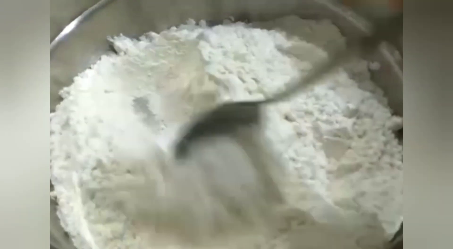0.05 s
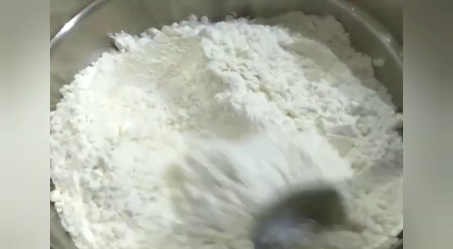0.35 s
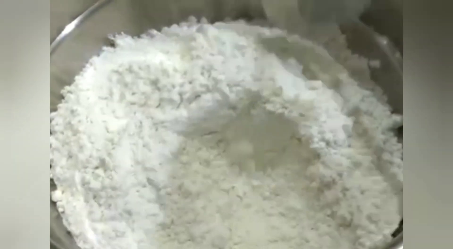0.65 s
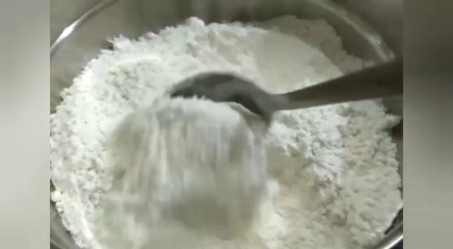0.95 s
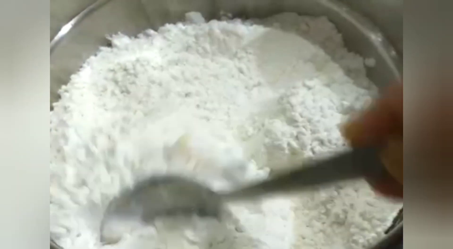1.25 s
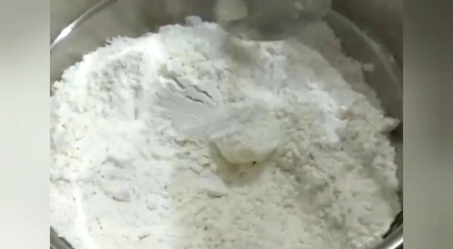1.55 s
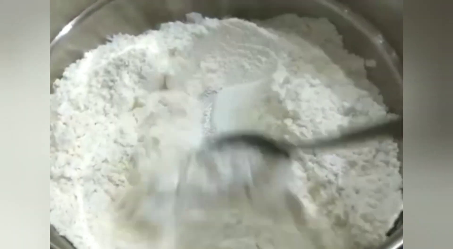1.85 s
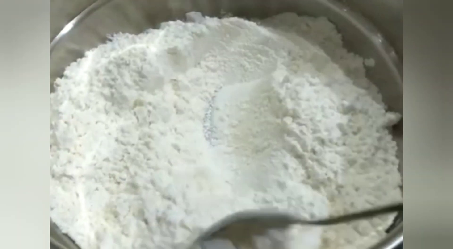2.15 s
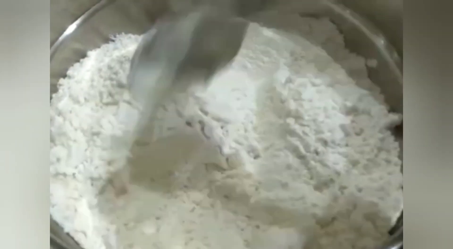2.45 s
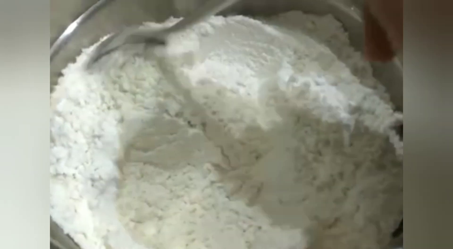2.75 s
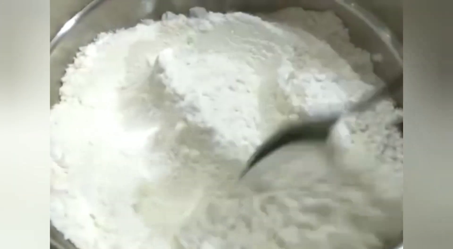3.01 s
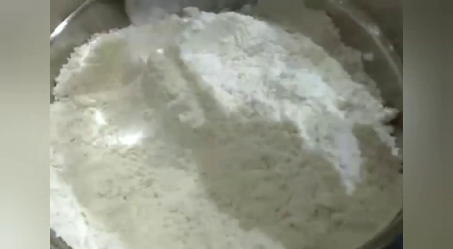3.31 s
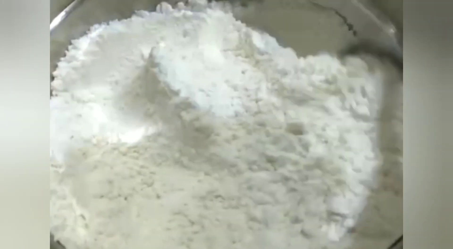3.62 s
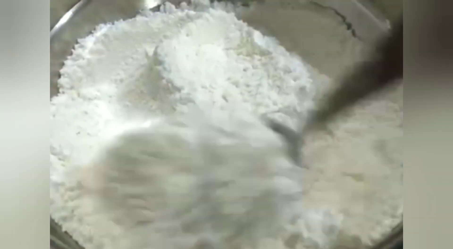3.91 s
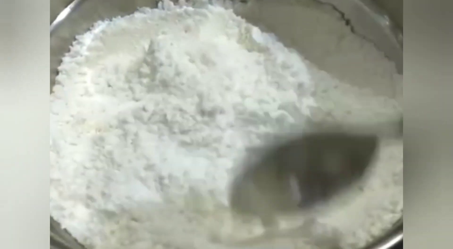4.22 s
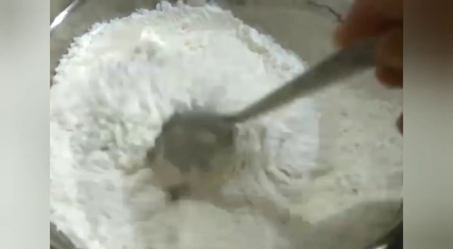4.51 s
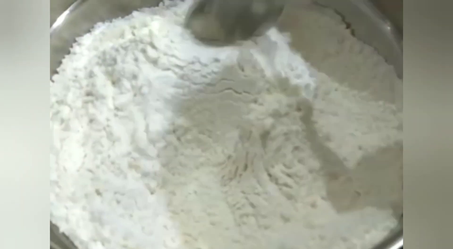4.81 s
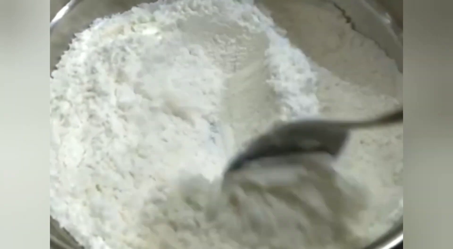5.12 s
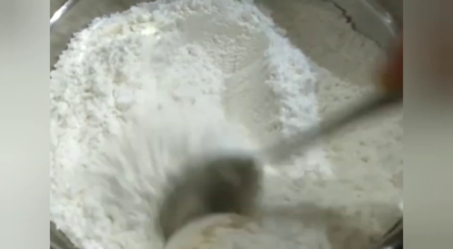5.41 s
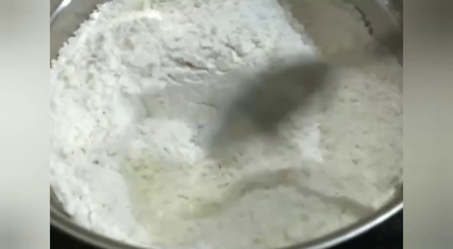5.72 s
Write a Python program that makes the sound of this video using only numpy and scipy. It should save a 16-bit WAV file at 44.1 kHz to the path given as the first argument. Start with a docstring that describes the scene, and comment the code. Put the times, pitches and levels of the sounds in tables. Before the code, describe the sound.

A metal spoon stirs flour in a steel bowl, with muffled knocks and dry scrapes over a low fan hum.

```python
"""Muffled knocks and dry scrapes: a steel spoon stirs flour in a stainless bowl, close by in a kitchen.
Each dig ends in a flour-cushioned knock: the bowl thuds and booms, then the spoon slides on.
Trapped powder sticks and slips in a rasp, bare steel squeaks, loose flour rushes aside.
A fan hums in the small room; two microphone ports are cross-subtracted to widen the stereo image."""
import sys
import numpy as np
from scipy import signal
from scipy.fft import rfft, irfft, next_fast_len
from scipy.io import wavfile
from scipy.ndimage import uniform_filter1d

SR = 44100
rng = np.random.default_rng(int(sys.argv[2]) if len(sys.argv) > 2 else 0)


def generate_wav(signal):
    """Clip the signal to [-1, 1] and save it as 16-bit WAV at the path in sys.argv[1]."""
    frames = np.transpose(np.atleast_2d(signal))
    scaled = np.clip(frames, -1, 1) * 32767
    pcm = np.round(scaled).astype(np.int16)
    wavfile.write(sys.argv[1], SR, pcm)


N = 262836
PORT_DELAY_S = 0.000427

# Spoon lands on the bottom and drags on: t/s, thud/dB, thud/Hz, thud crest/cycles, wall ring/dB,
# boom/dB, rattle/dB, clank/dB, clank/Hz, tick/dB, tick brightness/dB, steel ring/dB, drag/dB
KNOCKS = [(-0.010, -14, 305, 1.07, -15, -23.5, -23, -38, 990, -14, -24, -56, -63),
          (0.3533, -20, 414, 0.87, -23, -39.5, -32, -30, 1280, -39.5, 3, -50, -51),
          (0.8629, -14.5, 311, 0.88, -17, -26, -26, -12.5, 733, -40, 6, -63, -72),
          (1.2304, -10, 477, 0.99, -11, -31, -27, -21, 1290, -34, -3, -38.5, -56.5),
          (1.752, -17.5, 364, 0.87, -20, -28.5, -19, -32, 1396, -32, -27, -67, -52),
          (2.2292, -16.5, 432, 1.49, -19, -37, -28, -17.5, 1343, -32.5, 8.5, -48, -69),
          (2.81, -24, 340, 1.7, -18, -29.5, -26.5, -33, 1390, -26.5, -8.5, -47, -52.5),
          (3.2637, -30.5, 390, 0.74, -27, -41.5, -24.5, -32, 1860, -39.5, -12, -68, -71),
          (3.4374, -19.5, 365, 0.83, -18.5, -31.5, -26.5, -38, 1310, -30, -8, -69, -76),
          (4.935, -15.5, 357, 0.83, -18, -26.5, -20, -21, 1205, -32, -11, -52.5, -57),
          (5.473, -5, 487, 0.99, -14.5, -28.5, -23.5, -18.5, 1435, -25, -8.5, -62, -66),
          (5.884, -12, 511, 0.76, -15.5, -43, -22, -44, 770, -36.5, -7, -49, -68)]
# High modes of spoon and rim: f/Hz, level/dB, t60/s
STEEL_MODES = [(3365, -9.5, 0.1), (3550, -8, 0.023), (3726, 2, 0.035), (4090, -9, 0.04), (5080, 3, 0.033),
               (5490, -0.5, 0.064), (6400, -11, 0.16), (6620, -2, 0.091), (7490, -1.5, 0.086),
               (7560, -18, 0.073), (8470, -13.5, 0.11), (10700, -20, 0.058), (12540, -26, 0.1)]


def thuds(overtone_ratio=1.74, overtone_db=-12, wall_rise_s=0.0065, load_detune=0.0085):
    """A cushioned blow pushes the bowl for a few cycles; the wall rings on, retuned by shifting flour."""
    # Flour-damped bowl: f/Hz, level/dB, t60/s
    bowl_modes = [(224.8, -26, 0.35), (281, -19, 0.099), (325, -24.5, 0.4), (351, -11.5, 0.18),
                  (467.8, -23.5, 0.33), (556, -30.5, 0.39), (636, -29, 0.47), (674.6, -16.5, 0.12),
                  (796.4, -14, 0.076), (831, -27, 0.14), (953, -29, 0.12), (1260, -33, 0.08),
                  (1362, -20, 0.043)]
    out, t = np.zeros((2, N)), np.arange(SR // 2) / SR
    for s, db, hz, crest_cycles, wall_db, *_ in KNOCKS:
        age, phase = hz * t / crest_cycles, 2 * np.pi * hz * t
        envelope = (age * np.exp(1 - age)) ** 4
        push = envelope * (np.sin(phase) + amp(overtone_db) * np.sin(overtone_ratio * phase))
        loaded = [(mode_hz * (1 + load_detune * rng.standard_normal()), mode_db, t60_s)
                  for mode_hz, mode_db, t60_s in bowl_modes]
        wall = np.array([ring(loaded, t) for port in range(2)]) * (1 - np.exp(-t / wall_rise_s))
        add(out, s, amp(db) * push * amp([[2.4], [-2.4]]) + amp(wall_db) * wall)
    return band(out, 106, 8400, order=3)  # a small bowl radiates no deep bass


def booms(hz=154.2, rise_s=0.0071, t60_s=0.46):
    """After each knock the bowl's base rings on one hollow note."""
    out, t = np.zeros((2, N)), np.arange(SR // 2) / SR
    envelope = (1 - np.exp(-t / rise_s)) * amp(-60 * t / t60_s)
    note = envelope * np.sin(2 * np.pi * hz * t)
    for s, _, _, _, _, boom_db, *_ in KNOCKS:
        add(out, s, amp(boom_db) * note * amp([[.7], [-.7]]))
    return out


def contacts(knock_tick_hz=4010, tap_tick_hz=3100, clank_re_rattle_db=1.5, ring_re_tick_db=-28):
    """Metal hits: t/s, rattle/dB, clank/dB, clank/Hz, tick/dB, tick/Hz, brightness/dB, ring/dB."""
    # Spoon edge touches the wall: t/s, rattle/dB, clank/Hz, tick/dB, tick brightness/dB
    edge_taps = [(0.1297, -27.5, 2130, -38, -25), (0.543, -52, 1800, -39, -13),
                 (0.863, -33.5, 1530, -48, -10), (2.827, -38, 1490, -43, -13), (2.8836, -47, 1600, -32, -8),
                 (3.0795, -34.5, 920, -59, -18), (3.211, -37, 2130, -42.5, -13),
                 (3.452, -34, 1440, -52, -12), (4.8325, -37.5, 1090, -65, -13),
                 (5.44, -24.5, 2080, -37.5, 1), (5.4523, -40, 1900, -30.5, -20),
                 (5.4957, -40, 1290, -36, -15)]
    knocks = [(s, rattle_db, clank_db, clank_hz, tick_db, knock_tick_hz, bright_db, ring_db)
              for s, *_, rattle_db, clank_db, clank_hz, tick_db, bright_db, ring_db, _ in KNOCKS]
    taps = [(s, rattle_db, rattle_db + clank_re_rattle_db, clank_hz,
             tick_db, tap_tick_hz, bright_db, tick_db + ring_re_tick_db)
            for s, rattle_db, clank_hz, tick_db, bright_db in edge_taps]
    return knocks + taps


def clinks(wall_t60_s=0.015, tick_t60_s=0.026, wall_rise_s=0.0017, tick_rise_s=0.0012):
    """Metal bites through the powder: wall clank and rattle, a bright tick, a faint ring."""
    out, t = np.zeros((2, N)), np.arange(SR // 6) / SR
    onset = lambda rise_s: 1 - np.exp(-(t / rise_s) ** 2)
    for s, rattle_db, clank_db, clank_hz, tick_db, tick_hz, bright_db, ring_db in contacts():
        noise = rng.standard_normal((2, len(t)))
        rattle = amp(rattle_db) * unit(band(noise, clank_hz / 2.5, clank_hz * 1.36))
        clank = amp(clank_db) * np.sin(2 * np.pi * clank_hz * t)
        wall = onset(wall_rise_s) * amp(-60 * t / wall_t60_s) * (clank + rattle)
        tick = amp(tick_db - 60 * t / tick_t60_s) * grit(len(t), tick_hz, bright_db, spiky_db=3)
        bite = onset(tick_rise_s) * (tick + amp(ring_db) * ring(STEEL_MODES, t))
        add(out, s, wall * amp([[-2.5], [1.8]]) + bite * amp([[1.5], [-3]]))
    return out


def strokes(drag_s=0.0635, drag_hz=4160, sweep_hz=4650, sweep_bright_db=7, swell_db=5):
    """Sliding contacts: a course of (t/s, pressure/dB, brightness/dB) rows and a rasp/Hz for each."""
    # Spoon presses through to the steel: start/s, length/s, level/dB, rasp/Hz
    presses = [(0.000, 0.038, -45, 3100), (0.042, 0.1, -58.5, 3750), (0.409, 0.019, -40, 4330),
               (0.865, 0.015, -40, 8000), (0.883, 0.025, -38, 8000), (2.253, 0.086, -45, 3900),
               (2.885, 0.02, -42.5, 3540), (3.272, 0.029, -46.5, 3500), (3.558, 0.0046, -32.5, 8500),
               (3.57, 0.01, -38, 8500), (3.581, 0.0058, -35, 8500), (4.315, 0.06, -58, 5100),
               (4.543, 0.021, -52.5, 5500), (5.537, 0.02, -51.5, 6000), (5.907, 0.045, -47, 4650)]
    # One long sweep round the wall: t/s, pressure/dB, brightness/dB re sweep_bright_db
    sweep_course = [(3.461, -55, -5), (3.528, -39.5, -2.5), (3.586, -44.5, 4), (3.594, -44, -5.5),
                    (3.698, -47, -1), (3.765, -43, -30), (3.811, -66, -7)]

    def swell(s, length_s, db, bright_db):
        return [(s, db - swell_db / 2, bright_db), (s + length_s, db + swell_db / 2, bright_db)]
    drags = [(swell(s, drag_s, db, bright_db=5.5), drag_hz) for s, *_, db in KNOCKS]
    rasps = [(swell(s, length_s, db, bright_db=-1.5), hz) for s, length_s, db, hz in presses]
    sweep = [(s, db, bright_db + sweep_bright_db) for s, db, bright_db in sweep_course]
    return drags + rasps + [(sweep, sweep_hz)]


def scrapes(edge_s=0.0009, crunch_db=-5, wall_ref_db=-14, wall_ref_hz=4650, wall_db_per_octave=-12):
    """Trapped powder sticks and slips: hiss through the steel, a low rasp from the wall."""
    treble, wall = np.zeros((2, N)), np.zeros((2, N))
    for course, rasp_hz in strokes():
        s, db, bright_db = np.transpose(course)
        start, end = s[0], s[-1]
        t = start + np.arange(round((end - start) * SR) + SR // 20) / SR
        contact = np.tanh((t - start) / edge_s) * (1 - np.tanh((t - end) / edge_s)) / 2
        pressure = contact * amp(np.interp(t, s, db))
        rasp = grit(len(t), rasp_hz, np.interp(t, s, bright_db), spiky_db=2.5)
        add(treble, start, pressure * (rasp + amp(crunch_db) * crunch(len(t))))
        wall_db = wall_ref_db + wall_db_per_octave * np.log2(rasp_hz / wall_ref_hz)
        add(wall, start, amp(wall_db) * pressure * unit(band(diffuse(len(t)), 400, 1180)))
    return wall + steel_ring(patchy(treble)) * amp([[-5.3], [-9.3]])


def grit(n, rasp_hz, bright_db, spiky_db, clump_db=1.5):
    """Clumped micro-slips: a rasp pitched by the contact point, plus hiss at bright_db re the rasp."""
    lumps = lambda size: unit(uniform_filter1d(rng.standard_normal(n), size))
    strength = amp(spiky_db * lumps(size=24) + clump_db * lumps(size=220))
    coarse, fine = rng.standard_normal((2, 2, n)) * strength
    rasp = unit(band(coarse, rasp_hz / 1.49, rasp_hz * 1.41))
    fizz = band(fine, 5200, 19500)
    hiss = unit(band(fizz, 1300, 5600, order=1))
    return rasp + amp(bright_db) * hiss


def crunch(n, crumbs_per_s=280, spread_db=0.5, decay_s=0.0005):
    """Flour lumps burst under the spoon, one crackle each."""
    bursts = rng.random(n) < crumbs_per_s / SR
    sizes = amp(spread_db * np.clip(rng.standard_normal(n), -2, 2))
    envelope = signal.lfilter([1], [1, -np.exp(-1 / (decay_s * SR))], bursts * sizes)
    return unit(band(envelope * rng.standard_normal((2, n)), 900, 11000, order=1))


def patchy(x, patchy_db=4.0):
    """Random gain over time and frequency gives the scrape an uneven, shifting colour."""
    spectrum = signal.stft(x, nperseg=512)[2]
    patches = uniform_filter1d(rng.standard_normal(spectrum.shape[1:]), size=4, axis=0)
    patches = uniform_filter1d(patches, size=4, axis=1)
    gain = unit(amp(patchy_db * unit(patches)))
    return signal.istft(spectrum * gain, nperseg=512)[1][:, :N]


def steel_ring(x, ring_db=-44.5):
    """Excitation heard directly and through the steel's modes, weighted anew at each port."""
    t = np.arange(SR // 4) / SR
    response = np.array([ring(STEEL_MODES, t) for port in range(2)])
    return x + amp(ring_db) * signal.fftconvolve(x, response, axes=1)[:, :N]


def squeaks(relative_width=0.023):
    """Uneven stick-slip feeds one narrow resonance, which glides as the contact moves."""
    # Bare steel catches on steel: start/s, length/s, level/dB, f/Hz, glide/Hz
    catches = [(0.004, 0.035, -59, 3226, 200), (0.412, 0.02, -59, 3280, 0), (0.414, 0.018, -60, 5780, 0),
               (0.864, 0.018, -48.5, 1776, 224), (0.867, 0.0066, -51.5, 3150, -2),
               (0.871, 0.01, -46.5, 7960, 0), (0.877, 0.032, -50, 1208, 345), (0.888, 0.028, -52, 990, 150),
               (0.965, 0.053, -60, 1040, 405), (2.284, 0.029, -56, 3310, 400),
               (2.314, 0.024, -58.5, 3740, 250), (2.824, 0.008, -44, 2947, 0),
               (2.882, 0.021, -48.5, 3570, -5), (2.884, 0.028, -60, 8000, 0),
               (3.495, 0.042, -52, 1295, 138), (3.505, 0.033, -54, 3180, 3), (3.515, 0.11, -60, 4210, -800),
               (3.558, 0.023, -47, 6380, 0), (3.56, 0.032, -48, 8260, 0), (3.56, 0.022, -47.5, 10800, 0),
               (3.658, 0.044, -54, 6250, 0), (3.715, 0.06, -64, 3300, 500), (4.945, 0.048, -59.5, 905, 480),
               (5.915, 0.069, -57.5, 3810, 0)]
    out = np.zeros((2, N))
    for s, length_s, db, hz, glide_hz in catches:
        n = round(length_s * SR)
        t = np.arange(n) / SR
        noise = rng.standard_normal(n + SR // 10)
        resonance = band(noise, hz * (1 - relative_width / 2), hz * (1 + relative_width / 2))
        glide = np.exp(1j * np.pi * glide_hz * t ** 2 / length_s)
        tone = unit(np.real(signal.hilbert(resonance)[-n:] * glide))
        add(out, s, amp(db) * tone * signal.windows.tukey(n, .5) * amp([[1.5], [-2.5]]))
    return out


def slumps():
    """Loose flour is ploughed aside or trickles off the spoon with a soft rush."""
    # Flour slides: peak/s, half length/s, level/dB, centre/Hz
    slides = [(0.18, 0.14, -61, 4500), (2.348, 0.086, -51, 520), (3.098, 0.28, -66, 7550),
              (3.53, 0.044, -42, 730), (3.685, 0.16, -47, 417), (4.34, 0.035, -44.5, 244),
              (5.248, 0.26, -66.5, 6500)]
    out, t = np.zeros((2, N)), np.arange(-SR // 2, SR // 2) / SR
    for s, half_s, db, hz in slides:
        rush = unit(band(diffuse(len(t)), hz / 2, hz * 2))
        add(out, s + t[0], amp(db) * np.exp(-(t / half_s) ** 2) * rush)
    return out


def kitchen(x, predelay_s=0.004):
    """Hard walls reverberate; stirring changes the echo, so each knock gets a new tail."""
    # Room decay: f/Hz, t60/s
    decay_times = [(150, 0.42), (500, 0.52), (1500, 0.27), (4000, 0.43), (14000, 0.2)]
    # Room re direct sound: f/Hz, level/dB
    echo_levels = [(100, 1.5), (300, -6.5), (600, -15), (1400, -3.5), (3500, -7), (6000, -8), (12000, -8.5)]
    out = np.zeros((2, N))
    cuts = [0] + [round(s * SR) - SR // 100 for s, *_ in KNOCKS[1:]] + [N]
    for start, end in zip(cuts, cuts[1:]):
        hz, t, noise = signal.stft(diffuse(SR // 2), SR, nperseg=256)
        t60_s = along(decay_times, hz)[:, None]
        energy_norm = np.sqrt(np.log(1e6) / (t60_s * SR))
        envelope = amp(along(echo_levels, hz)[:, None] - 60 * t / t60_s) * energy_norm
        tail = signal.istft(noise * envelope, SR, nperseg=256)[1]
        add(out, start / SR + predelay_s, signal.fftconvolve(x[None, start:end], tail, axes=1))
    return out


def fan():
    """Rushing air and slightly unsteady motor tones."""
    # Fan and room air: f/Hz, relative density/dB
    air_spectrum = [(25, -28), (62, -22), (84, -3), (130, -3), (220, 0.5), (420, 0), (550, -10), (880, -8),
                    (1020, -7.5), (1400, -13.5), (2100, -14.5), (4000, -25.5), (8000, -28.5),
                    (15000, -34.5)]
    # Air loudness: t/s, level/dB
    air_levels = [(0, -46), (1.5, -48), (3.2, -47.5), (4.2, -48), (4.8, -49.5), (5.9, -48.5)]
    # Motor tones: f/Hz, rms level/dB
    motor_tones = [(82.5, -65), (164.5, -58.5), (227, -58), (435, -63.5)]
    t = np.arange(N) / SR
    air = unit(filtered(diffuse(N), lambda hz: amp(along(air_spectrum, hz))))
    air *= amp(np.interp(t, *np.transpose(air_levels)))
    drift_rad = lambda: 3 * np.cumsum(rng.standard_normal(N)) / np.sqrt(SR)
    hum = sum(amp(db) * np.sqrt(2) * np.sin(2 * np.pi * hz * t + drift_rad()) for hz, db in motor_tones)
    return air + hum


def rumble(level_db=-57):
    """Faint low noise, unrelated at the two ports."""
    # Rumble: f/Hz, relative density/dB
    spectrum = [(25, -13), (55, -11.5), (90, -3), (200, -8), (500, -7), (1500, -55)]
    noise = rng.standard_normal((2, N))
    return amp(level_db) * unit(filtered(noise, lambda hz: amp(along(spectrum, hz))))


def diffuse(n):
    """Noise from all sides at the two ports: alike in the bass, unrelated in the treble."""
    def mid_side_gains(hz):
        coherence = .95 * np.sinc(2 * hz * PORT_DELAY_S)
        angle = np.arccos(coherence) / 2
        return np.array([np.cos(angle), np.sin(angle)])
    mid, side = filtered(rng.standard_normal((2, n)), mid_side_gains)
    return np.array([mid + side, mid - side])


def ring(modes, t):
    """Damped modes, each at a randomly varied strength."""
    gain = lambda db: amp(db + 2 * rng.standard_normal())
    return sum(gain(db) * amp(-60 * t / t60_s) * np.sin(2 * np.pi * hz * t) for hz, db, t60_s in modes)


def amp(db):
    """Decibels to gain."""
    return 10 ** (np.asarray(db) / 20)


def unit(x):
    """Scale to rms 1."""
    return x / np.sqrt(np.mean(x ** 2) + 1e-20)


def along(points, hz):
    """Interpolate (f/Hz, value) points on a log axis."""
    point_hz, values = np.transpose(points)
    return np.interp(np.log(hz + 1), np.log(point_hz), values)


def filtered(x, response):
    """Apply a complex frequency response."""
    n = x.shape[-1]
    padded = next_fast_len(n + 8192)
    return irfft(rfft(x, padded) * response(np.fft.rfftfreq(padded, 1 / SR)), padded)[..., :n]


def band(x, low_hz, high_hz, order=2):
    """Causal band-pass."""
    sos = signal.butter(order, [low_hz, min(high_hz, .48 * SR)], 'band', fs=SR, output='sos')
    return signal.sosfilt(sos, x)


def add(track, s, sound):
    """Mix a sound in at time s, cropped to the track."""
    i = round(s * SR)
    sound, i = sound[..., max(0, -i):], max(0, i)
    n = min(sound.shape[-1], N - i)
    track[..., i:i + n] += sound[..., :n]


def scene():
    """Spoon, bowl and flour in the room."""
    bowl = thuds() + clinks() + scrapes() + squeaks()
    return bowl + kitchen(bowl[0]) + booms() + slumps() + fan() + rumble()


def record(dry, top_hz=15850):
    """Each channel is its own port minus part of the delayed other one, band-limited."""
    # Cross-subtraction: f/Hz, share of the other port
    shares = [(150, 0.35), (600, 0.34), (1100, 0.77), (2300, 0.67), (4700, 0.93), (7000, 0.5), (9400, 0.4),
              (14000, 0.31)]
    other = filtered(dry[::-1], lambda hz: along(shares, hz) * np.exp(-2j * np.pi * hz * PORT_DELAY_S))
    return filtered(dry - other, lambda hz: hz < top_hz)


dry = scene()
out = record(dry)
generate_wav(out)
```